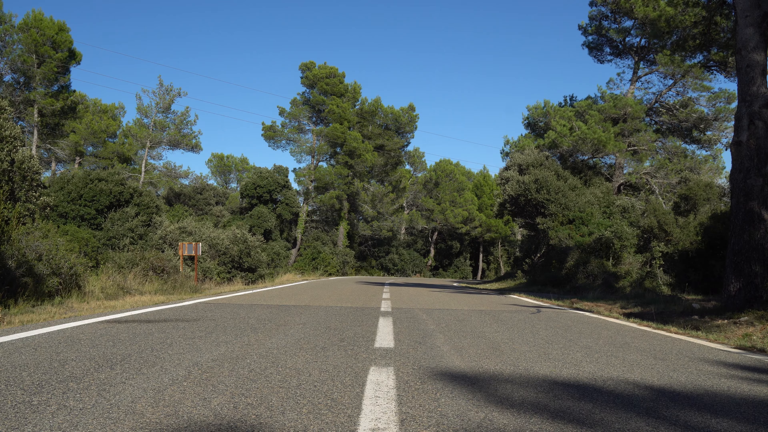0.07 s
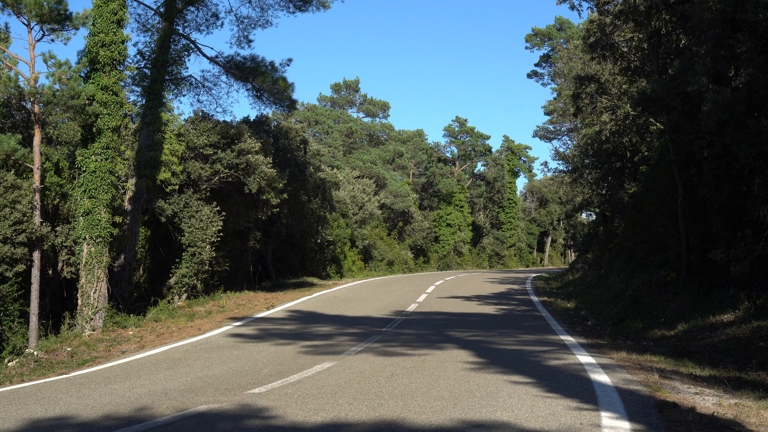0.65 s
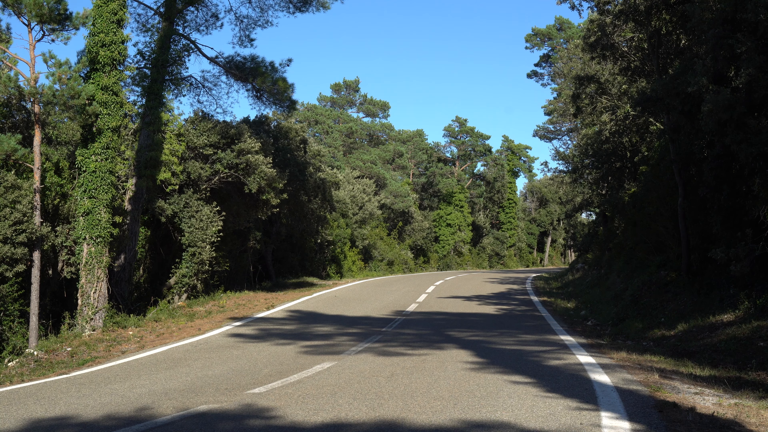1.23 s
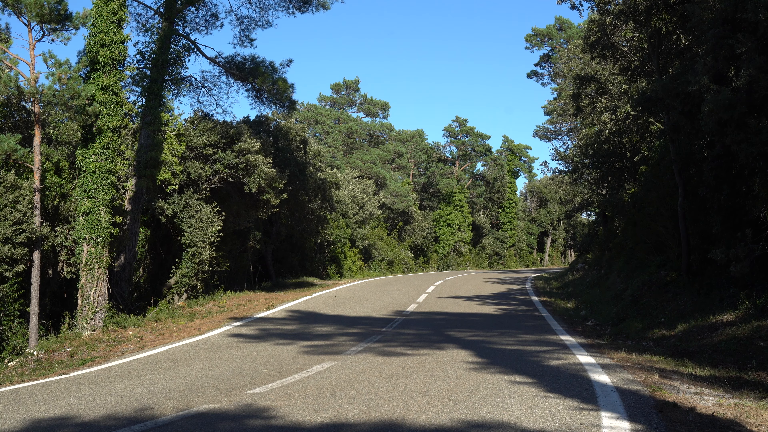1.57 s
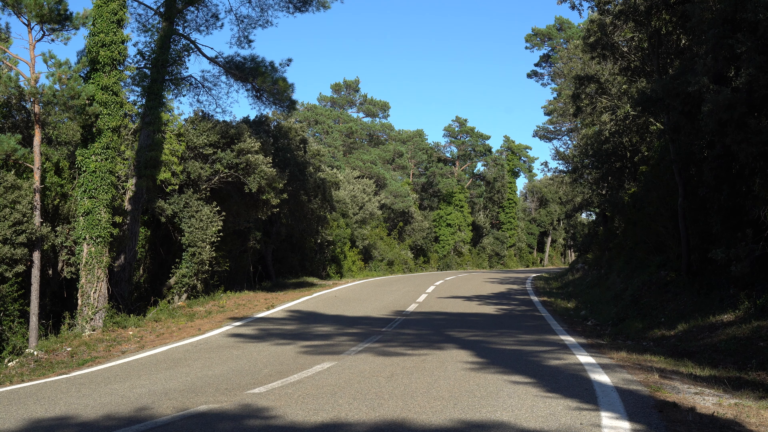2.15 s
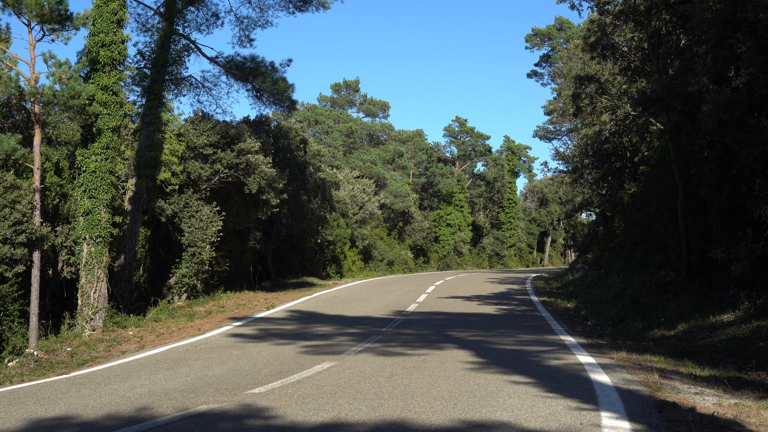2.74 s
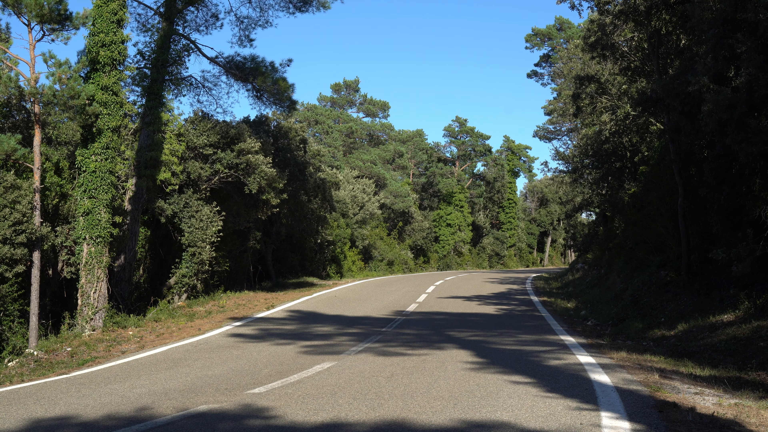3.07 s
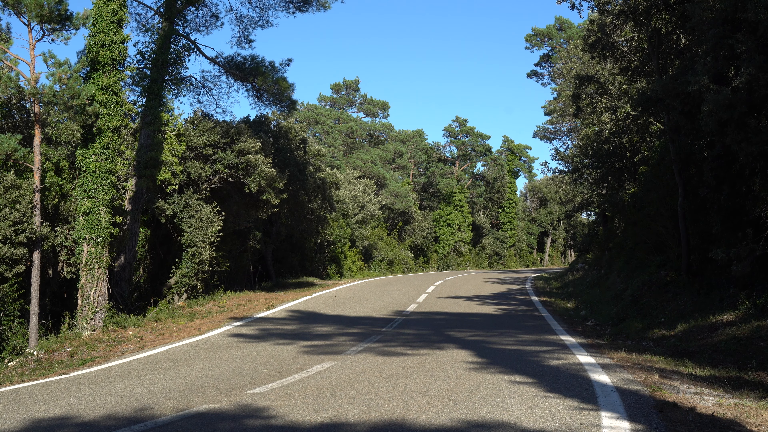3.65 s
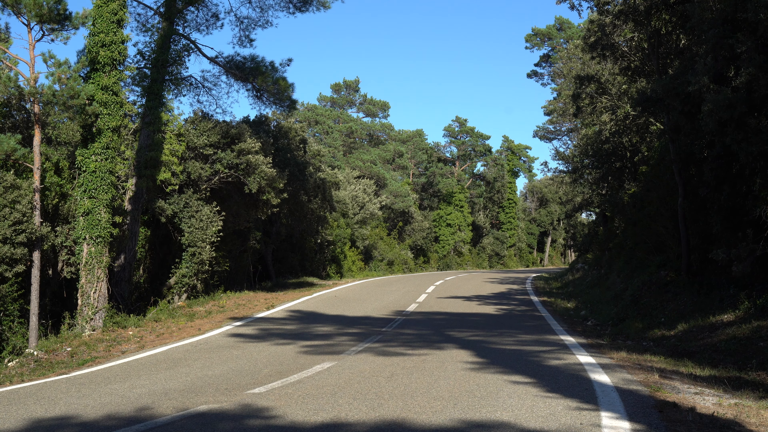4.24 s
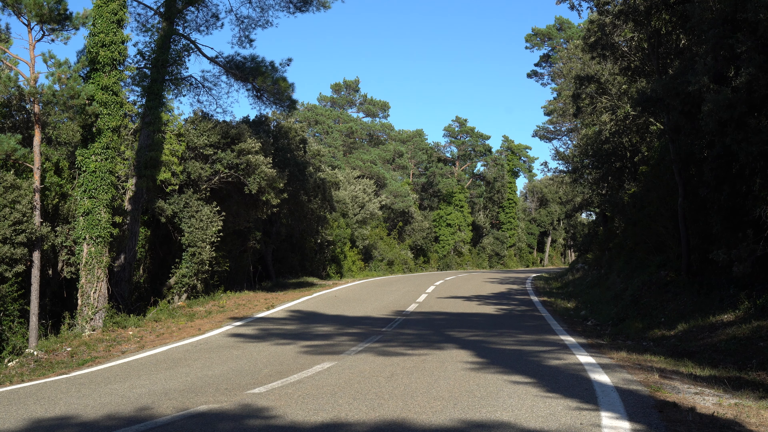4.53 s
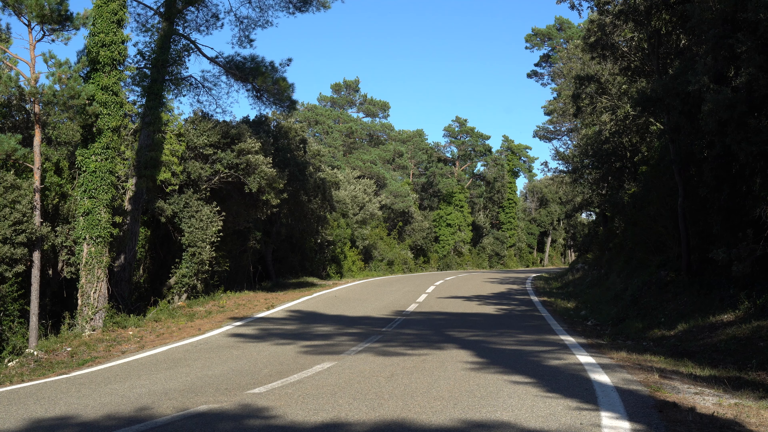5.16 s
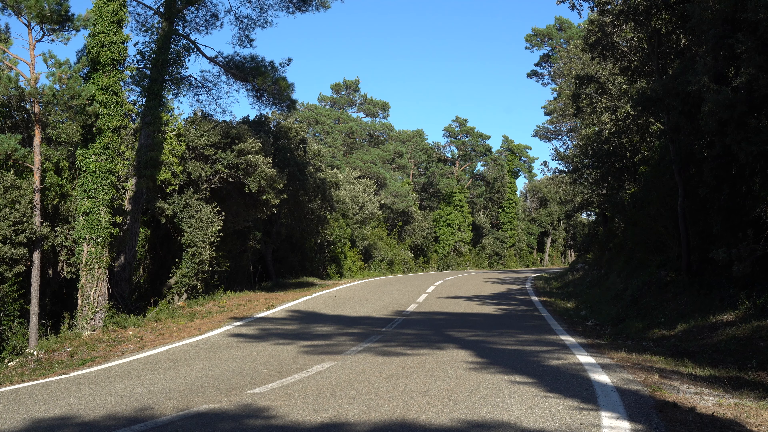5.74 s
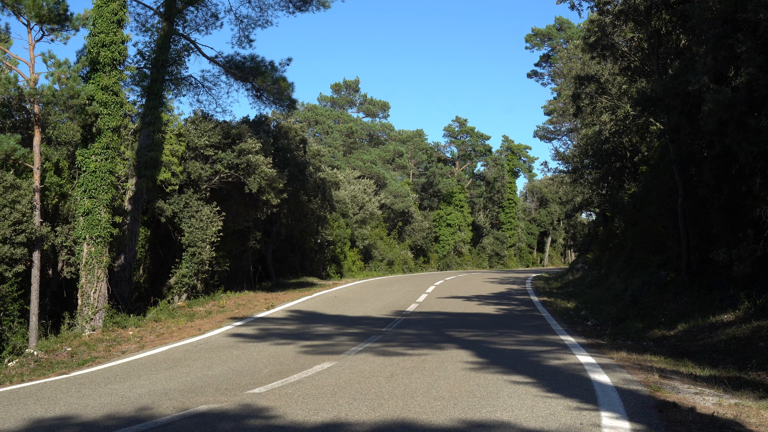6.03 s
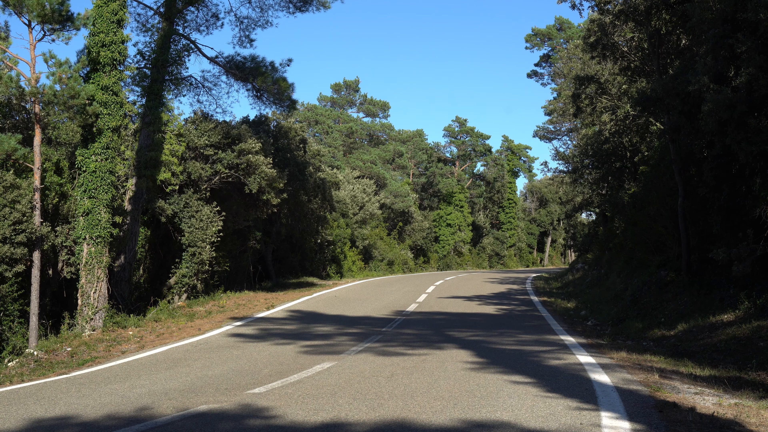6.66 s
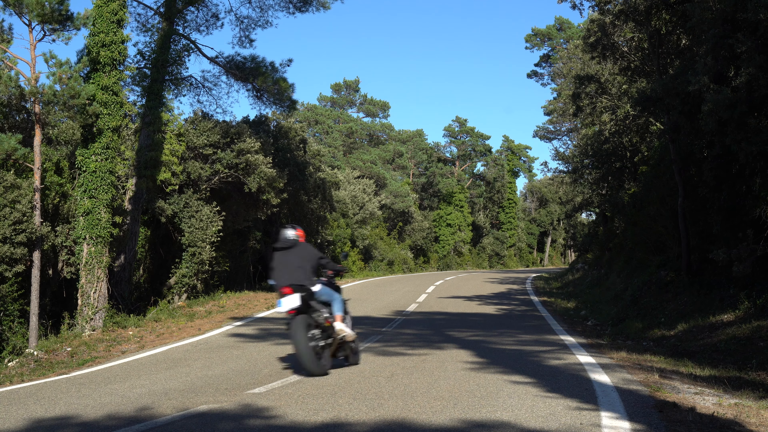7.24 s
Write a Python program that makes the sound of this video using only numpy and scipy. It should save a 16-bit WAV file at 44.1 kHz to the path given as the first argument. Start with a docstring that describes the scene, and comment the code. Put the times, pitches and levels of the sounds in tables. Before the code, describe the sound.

A motorcycle accelerates closer on a quiet forest road, shifts up twice and roars past at close range.

```python
"""A three-cylinder motorcycle accelerates up a forest road from behind on the left and passes close by.
It drops a gear, then shifts up twice, the pipe booming at each change. One firing rate, bent by the
Doppler shift, drives it all: exhaust orders sweep through the pipe's resonances, gas, intake, clatter
and tyre hiss pulse along, and the gears whine. The pines throw back an echo, a small bird calls
and the bike's wake rumbles as it goes past."""
import sys
import numpy as np
from scipy import signal
from scipy.fft import rfft, irfft, next_fast_len
from scipy.io import wavfile
from scipy.ndimage import uniform_filter1d, map_coordinates

SR = 44100
rng = np.random.default_rng(int(sys.argv[2]) if len(sys.argv) > 2 else 0)


def wav_out(sig):
    """Save sig, one row per channel (or a flat mono array), as 16-bit PCM at SR to the path in sys.argv[1]."""
    wavfile.write(sys.argv[1], SR, np.round(np.clip(np.atleast_2d(sig).T, -1, 1) * 32767).astype(np.int16))


N = 321930
TIME = np.arange(N) / SR
PASS_S, SPEED_M_PER_S, MISS_M = 7.06, 27, 3.22  # the closest approach

# pipe booms at the gear changes: t/s, level/dB, half-width/s, f/Hz
PIPE_BOOMS = [(.228, -52, .055, 109.5), (2.278, -51, 0.037, 126), (2.35, -52, .03, 92),
              (4.913, -43, .022, 140), (4.95, -44.5, .02, 138)]
# one pull per gear: throttle opens/s, shuts/s, starting firing rate/Hz, climb/(Hz/s), easing/(Hz/s^2),
# clutch flare at t/s, flare height/Hz, fall after shutting/(Hz/s)
GEAR_PULLS = [(.25, 2.236, 91.6, 26.5, 1.1, .2, 19, 175),
              (2.41, 4.893, 111.68, 14.28, -.82, 2.508, 16.5, 215),
              (5.07, 7.6, 129.9, 12.89, 1.83, 5.115, 9, 200)]


def amp(db):
    """Decibels to gain."""
    return 10 ** (np.asarray(db) / 20)


def unit(x):
    """Scale to rms 1."""
    return x / np.sqrt(np.mean(x ** 2) + 1e-20)


def along(points, hz):
    """Read (f/Hz, value) points on a log frequency axis."""
    f, v = np.transpose(points)
    return np.interp(np.log(hz + 1), np.log(f + 1), v)


def curves(rows):
    """One automation curve for each column after the time."""
    s, *cols = np.transpose(rows)
    return [np.interp(TIME, s, c) for c in cols]


def bell(s, half_width):
    """A smooth bump of height 1 around a moment."""
    return np.exp(-((TIME - s) / half_width) ** 2)


def wobble(rate):
    """A smooth random curve with rate knots a second."""
    knots = rng.standard_normal(int(N * rate / SR) + 4)
    coarse = TIME[::16]
    return np.interp(TIME, coarse, map_coordinates(knots, [coarse * rate]))


def filtered(x, response):
    """Equalise x with a gain that depends on frequency."""
    m = next_fast_len(N + 8192)
    return irfft(rfft(x, m) * response(np.fft.rfftfreq(m, 1 / SR)), m)[..., :N]


def noise(colour):
    """Two unrelated noises of rms 1, coloured by (f/Hz, level/dB) points."""
    return unit(filtered(rng.standard_normal((2, N)), lambda hz: amp(along(colour, hz))))


def blurred(turns, width_hz):
    """Two unrelated narrow noises of rms 1 around a tone whose phase is given in turns."""
    blur = np.array([wobble(width_hz) + 1j * wobble(width_hz) for ear in range(2)])
    return unit((blur * np.exp(2j * np.pi * turns)).real)


def pulsing(cycle, depth, lag):
    """A gain of rms 1 that swells once per firing."""
    return unit(np.exp(depth * np.cos(2 * np.pi * (cycle - lag))))


def panned(x, left_db):
    """Pan left by a level difference, keeping the mean gain of the two sides."""
    ratio = amp(left_db) * np.ones(N)
    return 2 * x * np.array([ratio, np.ones(N)]) / (1 + ratio)


def spread(pair, diffuse):
    """Set the width of two unrelated noises: 0 is mono, 1 fully diffuse."""
    turn = np.arccos(1 - np.clip(diffuse, 0, 1)) / 2
    mid, side = pair[0] * np.cos(turn), pair[1] * np.sin(turn)
    return np.array([mid + side, mid - side])


def forest(x, build_s=0.022):
    """Trunks scatter the sound back, differently to each side."""
    # reverb time among the pines: f/Hz, t60/s
    decay = [(100, 0.58), (400, 0.91), (1200, 0.67), (4000, 0.5), (12000, .2)]
    hz, t, spectrum = signal.stft(rng.standard_normal((2, SR)), SR, nperseg=256)
    tail = signal.istft(spectrum * amp(-60 * t / along(decay, hz)[:, None]), SR, nperseg=256)[1]
    tail *= 1 - np.exp(-(np.arange(tail.shape[1]) / SR / build_s) ** 2)
    echo = signal.fftconvolve(x[None], tail, axes=1)[:, :N]
    mid_gain = np.abs(rfft(tail, SR))[:, 100:1500]
    return echo / np.sqrt(np.mean(mid_gain ** 2))


def still_air():
    """A faint, wide bed of forest air."""
    # air colour: f/Hz, level/dB
    colour = [(20, 6), (45, 0), (100, -12), (300, 1), (1000, -10), (3000, -23.5), (6000, -26),
              (10000, -27.5), (15500, -28)]
    return amp(-62.5) * spread(noise(colour), 0.87) * amp([[1.2], [-1.2]])


def ticks(t60_s=.03):
    """Two small dry ticks of noise."""
    # tick onsets: t/s, level/dB
    hits = [(.177, -62), (.916, -61)]
    envelope = sum((TIME >= s) * amp(db - 60 * np.abs(TIME - s) / t60_s) for s, db in hits)
    return envelope * noise([(200, -15), (1200, 0), (4000, -5), (9000, -12), (15000, -22)])


def bird():
    """A small bird's thin, quivering calls echo in the pines."""
    # calls: t/s, length/s, f/Hz, relative level/dB
    calls = [(2.69, .1, 6380, -76), (2.89, 0.096, 6430, -72), (3.08, .12, 6449, -76),
             (3.292, .07, 6397, -75), (3.438, 0.058, 6150, -74)]
    trill = np.cumsum(90 * wobble(120)) / SR
    song = np.zeros(N)
    for s, length, hz, db in calls:
        swell = np.sin(np.pi * np.clip((TIME - s) / length, 0, 1))
        song += amp(db - 1) * swell * np.sin(2 * np.pi * (hz * TIME + trill))
    return song + amp(3) * forest(song)


def wake():
    """Air pushed aside by the bike rumbles as it passes."""
    # stirred air: f/Hz, level/dB
    colour = [(15, -30), (28, -11), (45, 0), (80, -2), (130, -14), (300, -40), (1000, -80)]
    return panned(amp(-46) * bell(7.144, .35) * spread(noise(colour), 0.6), left_db=4.4)


def road():
    """The bike's distance in m and its heading (-1 approaching, 1 leaving)."""
    past_m = SPEED_M_PER_S * (TIME - PASS_S)
    distance = np.hypot(past_m, MISS_M)
    return distance, past_m / distance


def revs(coast_hz=93.04, sag_hz_per_s=150, downshift_s=.175, flare_s=.042, bumps_hz=.15):
    """Firings a second: they sag until a gear catches them, flare as the clutch slips, then climb."""
    rate = coast_hz - sag_hz_per_s * TIME
    sagging, since = np.zeros(N), downshift_s
    for opens, shuts, start, climb, easing, flare_at, flare, fall in GEAR_PULLS:
        t = TIME - opens
        pull = start + climb * t - easing * t ** 2 + flare * bell(flare_at, flare_s)
        rate = np.where(TIME >= since, np.maximum(pull, sagging), rate)
        sagging = np.interp(shuts, TIME, pull) - fall * (TIME - shuts)
        since = shuts
    return uniform_filter1d(rate, size=800) + bumps_hz * wobble(9)  # road bumps shake the revs


def throttle(open_s=.13, shut_s=.016):
    """1 during each pull, 0 between them."""
    return sum(np.clip((TIME - opens) / open_s, 0, 1) * np.clip((shuts - TIME) / shut_s + .5, 0, 1)
               for opens, shuts, *_ in GEAR_PULLS)


def faders(distance, leaving, engine_rate, reference_m=10, reference_hz=140):
    """Each layer's level in dB, riding on distance, revs, heading and throttle."""
    # per layer: base level/dB, loss per doubling of distance/dB, loss per 100 m of forest/dB,
    # gain per octave of revs under load/dB, gain with the tail facing us/dB, gain off throttle/dB
    mix = { "order 1": (-28, 3, 8.6, 0.5, 1.2, -2.8), "order 2": (-25.5, 4.5, 5, 14.5, 1.2, -2),
           "order 3": (-27.5, 3, 14, 0, 2, -10), "growl": (-31.9, 2, 12, 16, 12, -12),
           "rasp": (-32.6, 3.5, 9, 16, 3.2, -11), "gas": (-31.7, 3.5, 10.4, -5, -3, 1),
           "intake": (-32.9, 3.5, 7.8, 14.5, 2.1, -5), "clatter": (-35, 6.3, 5.6, 3, -3, 0),
           "hiss": (-41.5, 11, 0, 4, -4.5, -2)}
    # slow swells of the whole engine, without the tyres: t/s, level/dB
    engine_swell = [(0, 1.5), (.5, -.5), (1.55, 0), (1.9, -2.5), (2.25, 0), (2.6, -1), (3.25, 1), (4.2, 0),
                    (4.9, .5), (5.2, -1.5), (5.85, 0), (6.45, 0.74), (6.75, 2.5), (7, -2), (7.3, 1.25)]
    # slow swells of single layers: t/s, level/dB
    layer_swells = { "order 1": [(0, 4), (.4, -2), (.75, 2.2), (1.55, 2.2), (1.9, -1), (3.2, 1),
                    (4.3, -1.5), (4.8, 0), (5.8, -1.7), (6.55, 1.3), (7, -.5)], "order 2": [(0, -7),
                    (.65, 0), (1, -4), (1.3, 0), (1.9, 5), (2.4, -2), (2.9, 1.5), (3.9, 1.5), (4.35, -3),
                    (4.7, 1.5), (5.4, 2), (5.8, -1.5), (6.15, 2.5), (6.42, -4), (6.7, 0.5)],
                    "order 3": [(0, 15), (.48, -7), (.95, -5), (1.2, 6), (1.45, -5.5), (1.8, 6), (2.2, -1),
                    (2.9, 0), (3.5, 7), (3.9, 2), (4.35, 3.5), (4.7, -8.5), (5.35, 3), (6.05, -2.5),
                    (6.6, 0), (7.1, 0)], "growl": [(0, 11), (.4, 4), (.8, 2), (1.8, .5), (2.7, -5.5),
                    (3.6, 1), (4.4, 1), (5.2, -1.5), (6.8, -0.5), (7.2, 1)], "intake": [(0, -4.5), (.3, 0),
                    (1.9, 0), (2.2, 3.5), (2.55, -0.5), (3.2, 2), (4.6, 0), (6, -1.2), (7.2, 0)],
                    "rasp": [(0, 0), (.4, 8), (.78, 8.5), (1.1, 0), (2.6, -2), (4.1, 4), (5.9, -3),
                    (6.4, -2), (6.72, 4), (6.97, -4.5), (7.27, 4.5)], "clatter": [(0, -2.5), (.5, -4.5),
                    (.95, -2), (1.2, 5), (1.45, -0.5), (2.3, 3), (3.5, -.5), (6.75, -.5), (6.98, 1.5),
                    (7.12, -2), (7.3, 1.5)], "hiss": [(3.3, .7), (5, -1.7), (6.15, 1.7), (6.6, 0.5),
                    (7.12, -1), (7.3, 4.5)]}
    doublings, octaves = np.log2(distance / reference_m), np.log2(engine_rate / reference_hz)
    tail, load = (1 + leaving) / 2, throttle()
    swell_db, = curves(engine_swell)
    levels = {}
    for layer, (db, spread_db, trees_db, revs_db, tail_db, shut_db) in mix.items():
        emitted_db = db + load * revs_db * octaves + (1 - load) * shut_db + tail_db * tail
        lost_db = spread_db * doublings + trees_db * distance / 100
        levels[layer] = emitted_db - lost_db + swell_db * (layer != "hiss")
    for layer, swell in layer_swells.items():
        levels[layer] += curves(swell)[0]
    return levels


def tyre_hiss(cycle, level_db):
    """Tyre hiss that fills out as the bike passes."""
    # distant hiss: f/Hz, level/dB
    far_colour = [(3500, -23), (5200, -2.5), (6300, -3), (8000, -5.5), (10000, -9), (12500, -15.5),
                  (15500, -25)]
    # close hiss: f/Hz, level/dB
    near_colour = [(3000, 1), (4800, -0.5), (6500, 0), (8000, -2.5), (10400, -7), (12500, -7.5),
                   (15500, -18)]
    near = bell(PASS_S, .26)
    hiss = np.sqrt(1 - near) * noise(far_colour) + np.sqrt(near) * noise(near_colour)
    return amp(level_db + 0.57 * wobble(60)) * pulsing(cycle, depth=0.12, lag=0.096) * hiss


def engine_clatter(cycle, level_db):
    """Mechanical noise that pulses with the firings and brightens on the approach."""
    # distant clatter: f/Hz, level/dB
    far_colour = [(1300, -30), (1800, -2.5), (2100, 1.5), (2600, -1), (3300, -2), (3800, -8.5), (4500, -15),
                  (6000, -23.5), (7500, -34), (12000, -60)]
    # close clatter: f/Hz, level/dB
    near_colour = [(1300, -32), (1800, 1), (2100, -2), (2800, -2.5), (3700, -4.5), (4400, -8.5),
                   (5200, -15.5), (6000, -17.5), (7500, -29), (12000, -62)]
    far = np.interp(TIME, [2.6, 4.2], [1, 0])
    clatter = np.sqrt(far) * noise(far_colour) + np.sqrt(1 - far) * noise(near_colour)
    return amp(level_db + 0.34 * wobble(45)) * pulsing(cycle, depth=0.078, lag=0.046) * clatter


def gear_whine(cycle, rate, levels, left_db, diffuse, mesh_order=27.7, sizzle_order=66.3):
    """The primary gear's mesh tone, blurred by backlash; a thin metallic sizzle tracks the revs too."""
    # how the gear case radiates: f/Hz, level/dB
    gear_case = [(2700, -4), (3100, 10), (3500, -2), (3900, -1), (4300, 0), (4550, -8), (4800, -17)]
    whine_db = levels["clatter"] - 11.8 + 4.5 * bell(PASS_S, .6) + along(gear_case, mesh_order * rate)
    whine = amp(whine_db) * blurred(mesh_order * cycle, width_hz=500)
    near = np.interp(TIME, [5.2, 6.2], [0, 1])  # the air swallows the sizzle at a distance
    sizzle = near * amp(levels["hiss"] - 14) * blurred(sizzle_order * cycle, width_hz=750)
    return panned(spread(whine + sizzle, diffuse), left_db * 0.59)


def boom_envelope():
    """A bump of height 1 for each boom."""
    return sum(bell(s, half_width) for s, _, half_width, _ in PIPE_BOOMS)


def rushing(cycle, levels, left_db, diffuse, gulp_db=3):
    """Gas and intake noise puff with the firings, under clatter and hiss; booms swell the intake."""
    # exhaust gas: f/Hz, level/dB
    gas_colour = [(20, -25), (45, -17), (100, -5.5), (180, -11.5), (260, 1), (360, -5), (520, -3.5),
                  (720, -1), (880, -8.5), (1100, -18.5), (2000, -71)]
    # intake air: f/Hz, level/dB
    intake_colour = [(500, -27), (800, -5), (950, -1.5), (1250, 0.5), (1600, -4.5), (1950, -9),
                     (2400, -16.5), (4000, -84)]
    gas = amp(levels["gas"]) * pulsing(cycle, depth=0.086, lag=0.091) * noise(gas_colour)
    intake_db = levels["intake"] + gulp_db * boom_envelope()
    intake = amp(intake_db) * pulsing(cycle, depth=.15, lag=.15) * noise(intake_colour)
    top_end = engine_clatter(cycle, levels["clatter"]) + tyre_hiss(cycle, levels["hiss"])
    return (panned(spread(gas, diffuse * 1.3), left_db * 0.67)
            + panned(spread(intake, diffuse), left_db * 1.05)
            + panned(spread(top_end, diffuse * 1.1), left_db * 0.66))


def shift_booms(left_db):
    """The pipe booms and burbles for a moment at each gear change."""
    booms = np.zeros(N)
    for s, db, half_width, hz in PIPE_BOOMS:
        burble = (wobble(70) + 1j * wobble(70)) * np.exp(2j * np.pi * hz * TIME)
        booms += amp(db) * bell(s, half_width) * burble.real
    return panned(booms, left_db * .6)


def low_orders(cycle, levels_db, waver_db=1.7, uneven_db=-17, lag=0.6, lead=1.5):
    """The note's body: three clean orders; unequal cylinders add lines a third of an order away."""
    note = np.zeros(N)
    for k, db in enumerate(levels_db, 1):
        note += amp(db + waver_db * wobble(35)) * np.cos(2 * np.pi * k * cycle + lead - lag * k)
    uneven = amp(levels_db[1] + uneven_db)
    for thirds, db in [(4, -10), (5, 0), (7, -9), (8, -4)]:
        note += uneven * amp(db + waver_db * wobble(12)) * np.cos(2 * np.pi * thirds / 3 * cycle)
    return np.sqrt(2) * note


def high_orders(cycle, rate, orders, uneven_db, waver_db, smear=0.11, lag=0.15):
    """A band of orders, rms 1, sweeps through the pipe's resonances, which also smear each pulse."""
    # exhaust colour from far off, ahead of the bike, close by and behind it: f/Hz, level/dB
    far = [(400, 19), (560, -0.5), (680, 1.5), (790, 14), (900, -8), (1020, -19), (1150, -10), (1320, -7.5),
           (1480, -14), (1900, -23), (2600, -35), (4000, -36)]
    ahead = [(400, -2), (640, 8.5), (780, 10.5), (930, 6), (1060, 0), (1220, 4.5), (1400, -7.5),
             (1600, -9.5), (1900, -26), (2600, -20.5), (4000, -41)]
    close = [(400, -22), (630, -0.5), (780, 5), (940, -11.5), (1100, -2), (1260, -2.5), (1420, 0),
             (1580, -3), (1750, -12), (2600, -21), (4000, -35)]
    behind = [(400, -16), (560, 5.5), (710, 10.5), (840, -20), (990, -6.5), (1130, 0), (1280, -1.5),
              (1450, -6.5), (1800, -17), (2600, -24), (4000, -29)]
    # start and end of the three crossfades between those colours: t/s
    crossfades = [2.3, 3.3, 5.3, 6.3, 6.901, 7.12]
    coarse, coarse_rate = TIME[::64], rate[::64]
    view = np.interp(coarse, crossfades, [0, 1, 1, 2, 2, 3])
    # the engine repeats after three firings, so its lines lie a third of an order apart
    thirds = range(3 * orders[0] - 1, 3 * orders[-1] + 2)
    step = np.exp(2j * np.pi * cycle / 3)
    line, note, power = step ** thirds[0], np.zeros(N), 0
    for third in thirds:
        order, between = third / 3, third % 3 != 0
        db = sum(np.clip(1 - np.abs(view - i), 0, 1) * along(colour, order * coarse_rate)
                 for i, colour in enumerate([far, ahead, close, behind]))
        db += waver_db * map_coordinates(rng.standard_normal(100), [coarse * 10])
        gain = amp(db + between * uneven_db)
        phase = between * rng.uniform(0, 2 * np.pi) - lag - smear * (order - 6) ** 2
        note += np.interp(TIME, coarse, gain) * (line * np.exp(1j * phase)).real
        power += gain ** 2 / 2
        line = line * step
    return note / np.interp(TIME, coarse, np.sqrt(power))


def exhaust(cycle, rate, levels, left_db, diffuse, boom_lift_db=8.5, choke_db=8):
    """The firing note as body, growl and rasp; its echo falls back as the bike comes close."""
    boom = boom_envelope()
    body_db = [levels["order 1"] + boom_lift_db * boom,
               levels["order 2"] - choke_db * boom,
               levels["order 3"] - choke_db * boom]
    cycle = cycle + 0.0028 * wobble(140)  # no two firings are timed quite alike
    body = low_orders(cycle, body_db)
    growl = amp(levels["growl"]) * high_orders(cycle, rate, range(4, 7), uneven_db=-13, waver_db=1.0)
    rasp = amp(levels["rasp"]) * high_orders(cycle, rate, range(7, 19), uneven_db=-15, waver_db=1.4)
    direct = panned(body, left_db * 0.91) + panned(growl, left_db * 1.4) + panned(rasp, left_db * 1.63)
    send = np.sqrt(np.clip(diffuse, 0, 1)) * (amp(-13) * body + amp(-8) * (growl + rasp))
    # the right side is shaded from the bike and hears a larger share of the trees
    return direct + panned(forest(send), left_db * .1)


def scene():
    """One crankshaft drives the bike's layers, Doppler-shifted, over the quiet forest."""
    # stereo path, scaled by each layer: t/s, left over right/dB, diffuse share/(0-1)
    stereo_path = [(0, 7.5, .55), (1, 9, .8), (2.4, 10, .6), (6.6, 12.5, .6), (6.82, 17, .53),
                   (6.95, 11, 0.3), (7.11, 1, .11), (7.3, 0, .06)]
    left_db, diffuse = curves(stereo_path)
    distance, leaving = road()
    engine_rate = revs()
    rate = engine_rate / (1 + SPEED_M_PER_S * leaving / 343)
    cycle = np.cumsum(rate) / SR  # firings heard so far
    levels = faders(distance, leaving, engine_rate)
    bike = exhaust(cycle, rate, levels, left_db, diffuse) + rushing(cycle, levels, left_db, diffuse)
    bike += gear_whine(cycle, rate, levels, left_db, diffuse) + shift_booms(left_db)
    return bike + wake() + ticks() + bird() + still_air()


def record(dry, ceiling=.88, knee=8, top_hz=15750):
    """Soft-clip the highest peaks and cut the extreme treble."""
    held = dry / (1 + np.abs(dry / ceiling) ** knee) ** (1 / knee)
    return filtered(held, lambda hz: hz < top_hz)


dry = scene()
out = record(dry)
wav_out(out)
```